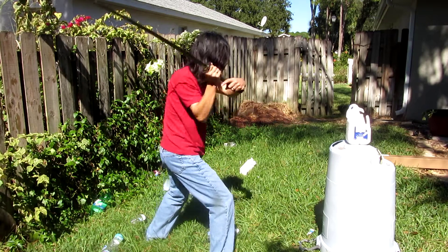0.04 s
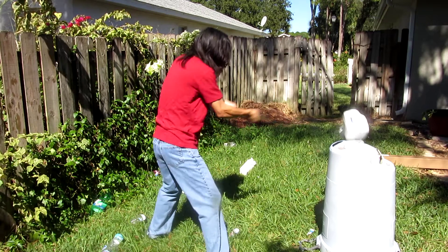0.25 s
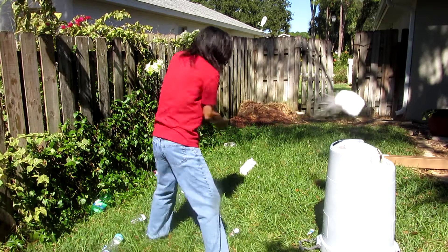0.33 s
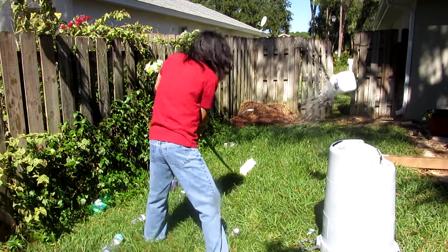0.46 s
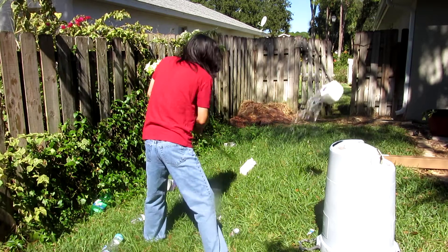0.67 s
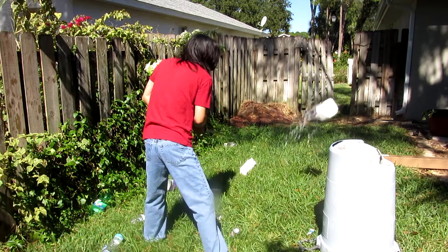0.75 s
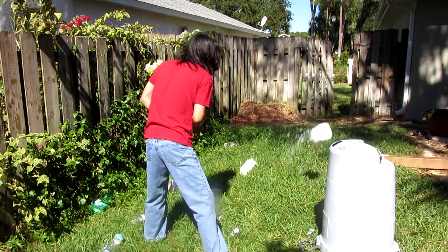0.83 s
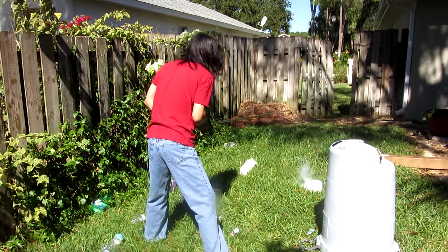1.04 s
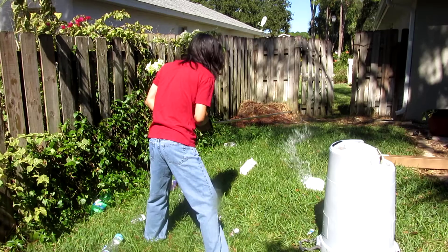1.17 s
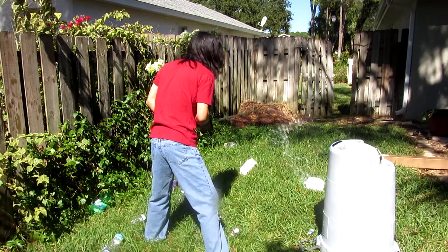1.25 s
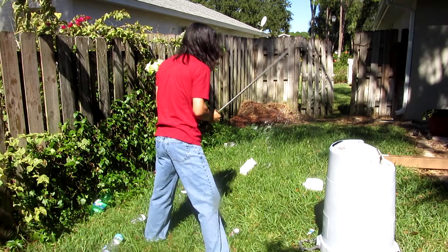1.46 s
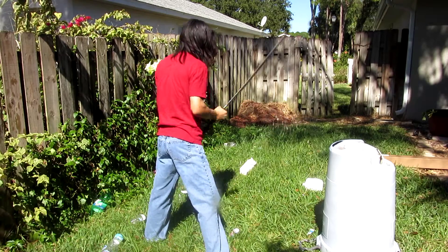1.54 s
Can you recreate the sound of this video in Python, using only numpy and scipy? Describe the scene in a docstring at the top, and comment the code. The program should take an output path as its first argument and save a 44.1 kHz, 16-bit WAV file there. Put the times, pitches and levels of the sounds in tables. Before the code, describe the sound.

A blade whistles and slices a plastic jug with a crack before it lands softly.

```python
"""A breeze rustles the leaves in a fenced backyard and rumbles briefly on the microphone.
A sword whistles through the air and cuts a water-filled plastic jug off its stand with a crack,
which overloads the microphone and turns its gain down. The jug rings and the fences echo.
A few drops tick down, then the jug thuds into the grass, bounces once and spatters water.
Last, a low rush of air swells."""
import sys
import numpy as np
from scipy import signal
from scipy.fft import rfft, irfft
from scipy.io import wavfile

SR = 44100
rng = np.random.default_rng(int(sys.argv[2]) if len(sys.argv) > 2 else 0)


def put_to_file(sound):
    """Save the sound as 16-bit audio at rate SR, in the file named by the first command-line argument."""
    columns = np.atleast_2d(sound).T  # one column per channel
    safe = np.clip(columns, -1, 1)
    whole_steps = np.round(safe * 32767)
    wavfile.write(sys.argv[1], SR, whole_steps.astype(np.int16))


N = 70560
TIME, FREQS = np.arange(N) / SR, np.fft.rfftfreq(N, 1 / SR)


def amp(db):
    """Turns decibels into a number to multiply by."""
    return 10 ** (np.asarray(db) / 20)


def unit(x):
    """Scales a signal to an average power of 1."""
    return x / np.sqrt(np.mean(x ** 2) + 1e-20)


def read(points, hz):
    """Looks up a frequency in a table, with octaves evenly spaced."""
    f, value = np.transpose(points)
    return np.interp(np.log(hz + 1), np.log(f + 1), value)


def colour(x, spectrum):
    """Gives x a tone colour (its balance of low and high), at power 1."""
    return unit(irfft(rfft(x) * amp(read(spectrum, FREQS)), N))


def low_cut(x, hz):
    """Takes away the bass below hz."""
    return signal.sosfilt(signal.butter(3, hz, "highpass", fs=SR, output="sos"), x)


def burst(start, rise, hold, t60):
    """A level that rises, holds and fades; t60 is the time it takes to fall 60 dB."""
    t = TIME - start
    fade = np.exp(-np.log(1000) * np.maximum(t - hold, 0) / t60)
    return np.clip(t / max(rise, 1 / SR), 0, 1) * fade


def ring(start, modes, rise):
    """The fading pure tones of something struck once."""
    return sum(amp(db) * burst(start, rise, 0, t60) * np.sin(2 * np.pi * hz * (TIME - start))
               for hz, db, t60 in modes)


def wobble(width_hz):
    """A smooth random wander, as complex numbers of power 1."""
    slow = rfft(rng.standard_normal((2, N))) / (1 + (2 * FREQS / width_hz) ** 4)
    return np.sqrt(.5) * np.array([1, 1j]) @ unit(irfft(slow, N))


def grains(per_s, spread_db, likeness=0.78):
    """Many tiny snaps of uneven size, much alike on the left and right."""
    chance, size, sign = rng.random((2, N)), rng.random((2, N)), rng.choice([-1, 1], (2, N))
    a, b = (chance < per_s / SR) * sign * amp(spread_db * size)
    return np.array([a, likeness * a + np.sqrt(1 - likeness ** 2) * b])


# how alike the two microphones hear noise: f/Hz, likeness (0 to 1)
LIKENESS = [(30, 0.16), (100, 0.72), (250, 0.7), (1000, 0.46), (4000, 0.28), (15000, 0.29)]

def stereo_noise():
    """Left and right hiss, partly alike."""
    a, b = rfft(rng.standard_normal((2, N)))
    same = read(LIKENESS, FREQS)
    return irfft(np.array([a, same * a + np.sqrt(1 - same ** 2) * b]), N)


def place(x, lead_s, right_db):
    """The right side hears x earlier and louder; negative values favour the left."""
    left, right = rfft(x * np.ones((2, 1)))
    late_left = left * np.exp(-2j * np.pi * FREQS * lead_s)
    tilt = amp(right_db / 2)
    return irfft(np.array([late_left / tilt, right * tilt]), N)


def outdoor_noise(spectrum, level, flutter_db, flutter_hz):
    """Noise that follows a slow level curve and flutters by chance."""
    db = np.interp(TIME, *np.transpose(level)) + flutter_db * wobble(flutter_hz).real
    return colour(stereo_noise(), spectrum) * amp(db)


# tone colours of the breeze and of a low rush of air: f/Hz, level/dB
BREEZE = [(20, -17), (50, -14), (80, 5.5), (130, 0.5), (220, 0), (550, 0), (900, -6.5), (1500, -16),
          (3000, -29.5), (8000, -110)]
SWELL = [(80, -19), (160, -8.5), (220, 8), (320, -7), (500, -5), (900, -38), (2000, -49)]
# how loud each is over time: t/s, level/dB
BREEZE_LEVEL = [(0, -37), (.24, -34.5), (.5, -41.5), (.95, -40), (1.2, -39), (1.42, -39), (1.6, -39.5)]
SWELL_LEVEL = [(0, -41.5), (1.15, -56.5), (1.42, -36.5), (1.52, -37), (1.6, -40)]

def breeze():
    """Air moves softly through the yard; a low rush sinks, then swells near the end."""
    air = outdoor_noise(BREEZE, BREEZE_LEVEL, flutter_db=1.5, flutter_hz=60)
    swell = outdoor_noise(SWELL, SWELL_LEVEL, flutter_db=2.5, flutter_hz=40)
    return place(air + swell, lead_s=.00001, right_db=2)


# tone colour of the leaves: f/Hz, level/dB
LEAVES = [(300, -43), (1200, -3.5), (2500, -0.5), (4000, -6), (6500, -4), (9000, -10.5), (11500, -20.5),
          (15000, -24), (17000, -64)]
# how loud they rustle: t/s, level/dB
LEAVES_LEVEL = [(0, -48.5), (.25, -46), (.56, -51.5), (0.749, -45.5), (0.902, -48.5), (0.992, -37.5),
                (1.2, -50.5), (1.6, -49.5)]

def leaves():
    """Leaves rustle with a bright, fluttering hiss."""
    rustle = outdoor_noise(LEAVES, LEAVES_LEVEL, flutter_db=1.5, flutter_hz=200)
    return place(rustle, lead_s=.000025, right_db=1)


# tone colour of wind on the microphone: f/Hz, level/dB
RUMBLE = [(15, -10), (45, 13.5), (75, 31), (100, 40), (160, -2), (400, -57)]
# how loud it rumbles: t/s, level/dB
RUMBLE_LEVEL = [(0, -76), (.05, -33.5), (.1, -50), (.25, -73), (.5, -66), (1.6, -66)]

def wind_rumble():
    """A puff of wind hits the microphone, mostly on the left."""
    rumble = outdoor_noise(RUMBLE, RUMBLE_LEVEL, flutter_db=2, flutter_hz=25)
    return place(rumble, lead_s=0, right_db=-13)


# the whistle of the swing: t/s, f/Hz, level/dB
SWING = [(.168, 680, -64), (0.178, 721, -46), (0.189, 747, -37.5), (0.2, 790, -31), (0.218, 835, -27.5),
         (.226, 864, -41), (.238, 960, -29.5), (.246, 970, -38.5), (0.254, 990, -27.5), (0.26, 1020, -27),
         (.268, 1020, -83)]

def sword_whistle():
    """Swirls of air behind the blade whistle higher as it speeds up."""
    s, hz, db = np.transpose(SWING)
    tone = np.exp(2j * np.pi * np.cumsum(np.interp(TIME, s, hz)) / SR)
    roughness = 1 + 0.2 * wobble(width_hz=160) + amp(-7) * wobble(width_hz=220)
    level = amp(np.interp(TIME, s, db, left=-np.inf, right=-np.inf))
    return place(unit((tone * roughness).real) * level, lead_s=-.00005, right_db=1)


CUT_S = .2624  # when the blade meets the jug
# tones of the snapping plastic: f/Hz, level/dB, t60/s
CRACK = [(2150, 16.5, 0.0046), (2634, 16, 0.0064), (3073, 10, 0.0068), (1676, -2.5, 0.0096),
         (4000, -5.5, .005), (5560, 2, .004), (12800, -4, 0.0028)]

def crack():
    """The plastic snaps under the edge."""
    snap = low_cut(ring(CUT_S, CRACK, rise=.00005), hz=900)
    return place(snap, lead_s=.000065, right_db=-4.5)


# tone colour of tearing plastic: f/Hz, level/dB
TEAR = [(30, -13), (120, -19), (270, -2), (650, 2), (1000, -7.5), (1800, -2), (3000, -7), (4200, -14.5),
        (6500, -16.5), (10000, -18.5), (14500, -38), (17000, -41)]

def tear():
    """The edge rips through the jug's wall in a run of tiny snaps."""
    snaps = colour(grains(per_s=3500, spread_db=18.5), TEAR)
    return amp(-1.5) * snaps * burst(CUT_S, rise=.0048, hold=.0069, t60=.15)


# tones of the drum under the jug, and of the jug's hollow and walls: f/Hz, level/dB, t60/s
STAND = [(92.5, -25, 0.33)]
JUG = [(240, -15, .08), (305, -17, .09), (412, -12, .18), (511, -7, .18), (586, -10, .34), (721, -14, .27),
       (810, -13, .2), (1045, -24, .25), (1398, -17, .27), (1456, -18, .22), (1783, -20, .26),
       (1958, -20, .22), (2013, -16, .27), (2341, -19, .24), (2628, -18, .21)]

def stand_and_jug():
    """The passing blade sets the stand and the jug ringing."""
    stand = ring(CUT_S, STAND, rise=.015)
    jug = amp(1.5) * ring(CUT_S + .009, JUG, rise=.004)
    return place(stand, lead_s=.0005, right_db=2) + place(jug, lead_s=.00022, right_db=3.5)


# tone colour of the echo: f/Hz, level/dB
ECHO = [(40, -22), (100, 9), (300, -15), (550, 2.5), (1000, -6), (2000, -5), (3000, -9), (4200, -12),
        (7000, -11), (10000, -25.5), (14500, -38), (17000, -71)]
# how long it lasts, from low to high: f/Hz, t60/s
ECHO_T60 = [(100, 0.41), (320, 0.34), (600, 0.56), (2000, 0.61), (6000, 0.36), (14000, 0.35)]

def fence_echo(hit_s, level_db):
    """Fences scatter a hit back as a wash of noise; the middle pitches last longest."""
    start = hit_s + .016  # the trip there and back
    hz, t, bands = signal.stft(colour(stereo_noise(), ECHO), SR, nperseg=256)
    fade = np.exp(-np.log(1000) * np.maximum(t - start, 0) / read(ECHO_T60, hz)[:, None])
    tail = signal.istft(bands * fade, SR, nperseg=256)[1][:, :N]
    fade_in = np.clip((TIME - start) / .012, 0, 1)
    return amp(level_db) * tail * fade_in


# drops and scraps coming down: t/s, level/dB, f/Hz, width/octaves, t60/s
DROPS = [(.519, -36.5, 5360, 1.07, .03), (.634, -34.5, 2600, 1.12, 0.043), (0.668, -30.5, 3600, .8, 0.013),
         (0.8414, -17, 6200, 0.75, 0.005), (0.842, -26.5, 2460, 0.27, 0.015),
         (0.8431, -26, 580, 0.83, 0.026), (0.847, -39, 5930, .6, .015), (0.931, -42, 3500, 0.72, 0.017)]

def drops():
    """Each drop lands with a tick, a puff of noise around its own pitch."""
    ticks = np.zeros(N)
    for s, db, hz, octaves, t60 in DROPS:
        band = np.exp(-np.log2((FREQS + 1) / hz) ** 2 / octaves ** 2)
        puff = unit(irfft(rfft(rng.standard_normal(N)) * band, N))
        ticks += amp(db) * puff * burst(s, rise=.00071, hold=0, t60=t60)
    return place(ticks, lead_s=.00002, right_db=2)


# each touch of the jug on the lawn: t/s, thud level/dB, ring level/dB, crunch level/dB
LANDINGS = [(1.0195, -60, -58, -26), (1.0282, -16.5, -22, -15.5), (1.0339, -11, -22, -14),
            (1.0406, -15, -20, -21), (1.0444, -18.5, -21.5, -25.5), (1.0648, -39, -15.5, -27)]
# tones of the thud and of the cut-open jug: f/Hz, level/dB, t60/s
THUD = [(198, 0, .1), (250, -4, .07), (145, -9, .06), (780, -5, .02)]
OPEN_JUG = [(194.7, -35, 0.81), (342, -1.5, .16), (369, -1, 0.11), (465, -5, 0.1)]
# tone colours of crushed grass and of spilling water: f/Hz, level/dB
GRASS = [(40, -37), (180, 19), (700, 2), (1300, -1.5), (3000, -0.5), (4200, -11), (8500, -12),
         (11500, -26.5), (15000, -31), (17000, -51)]
SPLASH = [(200, -16), (900, -9), (2500, -2), (4000, -7.5), (8000, -10), (11500, -29), (15000, -22),
          (17000, -45)]

def landing():
    """Each touch thuds, rings the open jug and crunches grass; water spatters out."""
    hit_s = LANDINGS[1][0]  # the first firm touch
    spatter = colour(grains(per_s=1700, spread_db=8), SPLASH)
    sound = amp(-40) * spatter * burst(hit_s, rise=.014, hold=.073, t60=.12)
    for s, thud_db, ring_db, crunch_db in LANDINGS:
        sound += amp(thud_db) * ring(s, THUD, rise=.00052)
        sound += amp(ring_db) * ring(s, OPEN_JUG, rise=.002)
        crunch = colour(grains(per_s=9900, spread_db=29), GRASS)
        sound += amp(crunch_db) * crunch * burst(s, rise=.001, hold=0, t60=.1)
    return place(low_cut(sound, hz=79) + fence_echo(hit_s, level_db=-36.5), lead_s=.00002, right_db=3)


def scene():
    """The swing, the cut and the fall, over the sounds of the yard."""
    swing = sword_whistle()
    rip_and_echo = place(tear() + fence_echo(CUT_S, level_db=-13.5), lead_s=.00005, right_db=2.5)
    cut = crack() + stand_and_jug() + rip_and_echo
    return swing + cut + drops() + landing() + breeze() + leaves() + wind_rumble()


def record(dry):
    """The gain drops at the crack and creeps back; peaks are squashed and the top treble is cut."""
    limit_db, cut_share, react_s, recover_db_per_s = -13, 0.53, 0.0013, 5.5
    power = signal.lfilter(np.ones(88) / 88, 1, (dry ** 2).mean(0))  # averaged over 2 ms
    power_db = 10 * np.log10(power + 1e-12)
    fall = TIME * recover_db_per_s
    peak_db = np.maximum.accumulate(power_db + fall) - fall  # holds each peak, then slowly lets go
    over_db = np.maximum(peak_db - limit_db, 0)
    smooth = np.exp(-1 / (react_s * SR))
    turned_down = dry / amp(cut_share * signal.lfilter([1 - smooth], [1, -smooth], over_db))
    clipped = turned_down / (1 + abs(turned_down) ** 6) ** (1 / 6)
    treble_cut = signal.firwin(255, 15750, window=("kaiser", 8), fs=SR)
    return signal.oaconvolve(clipped, treble_cut[None], "same")


dry = scene()
out = record(dry)
put_to_file(out)
```